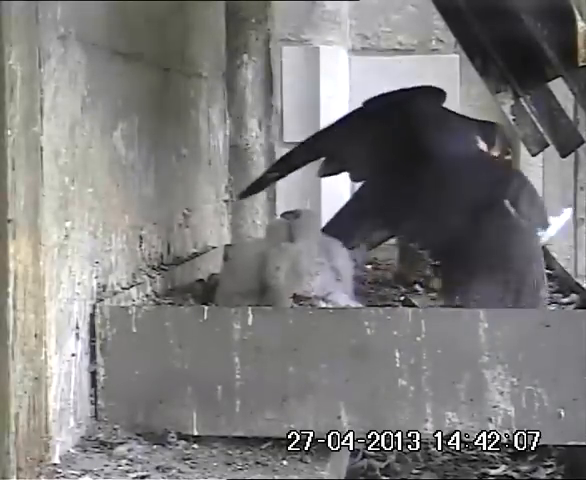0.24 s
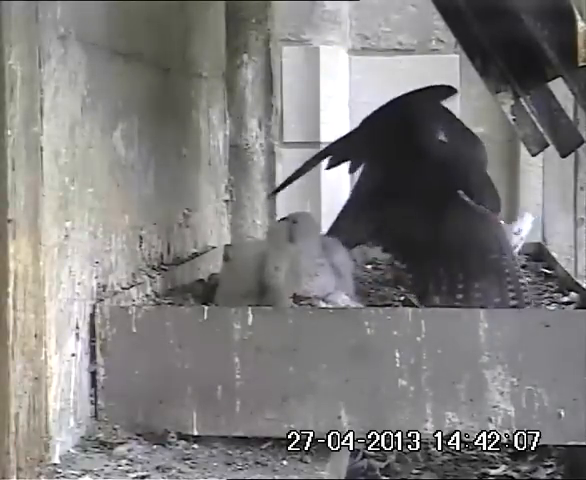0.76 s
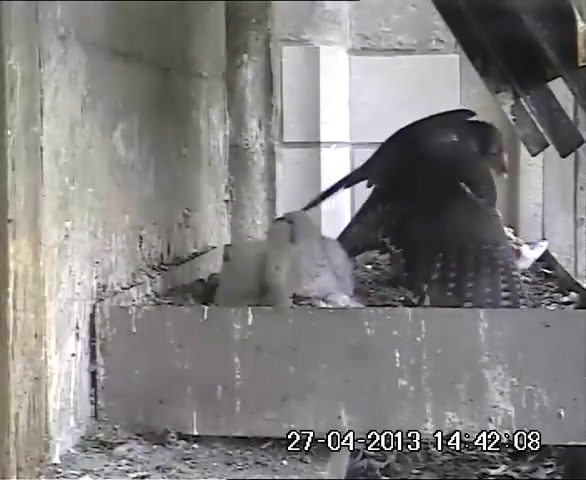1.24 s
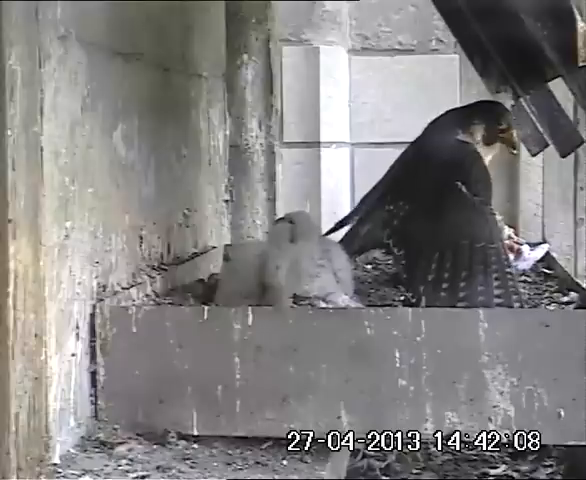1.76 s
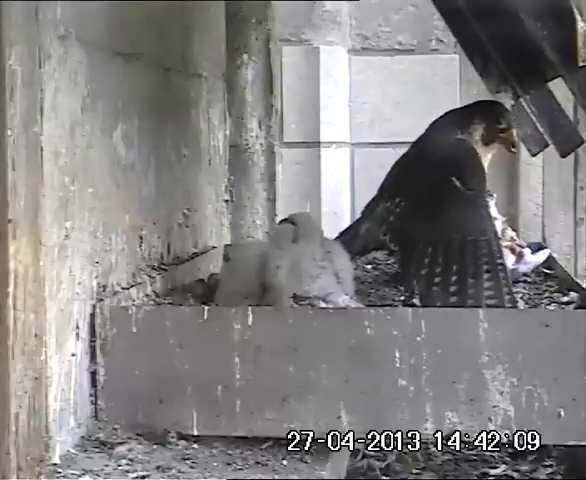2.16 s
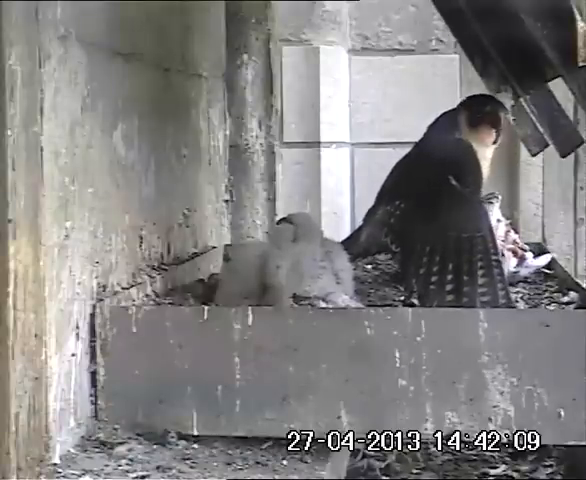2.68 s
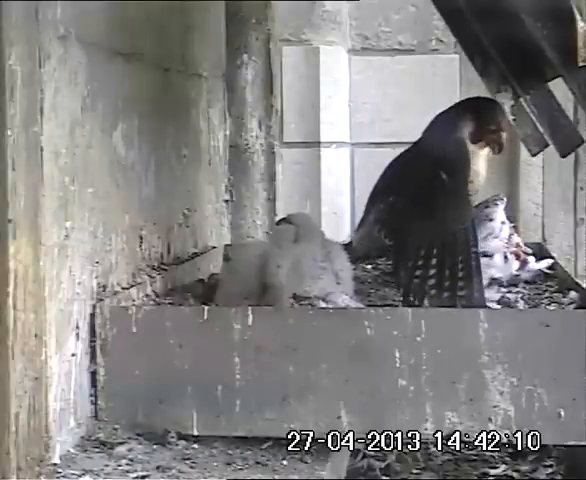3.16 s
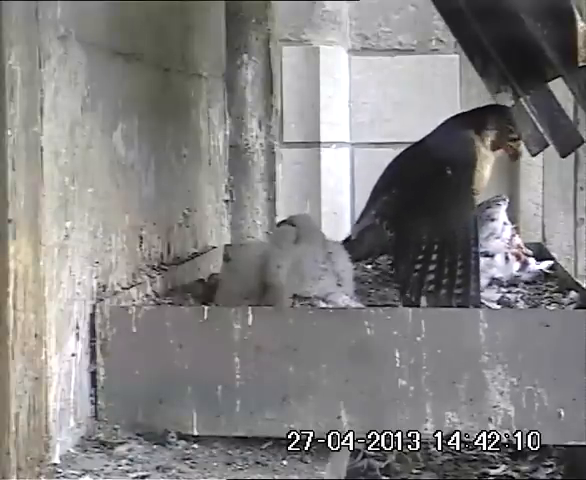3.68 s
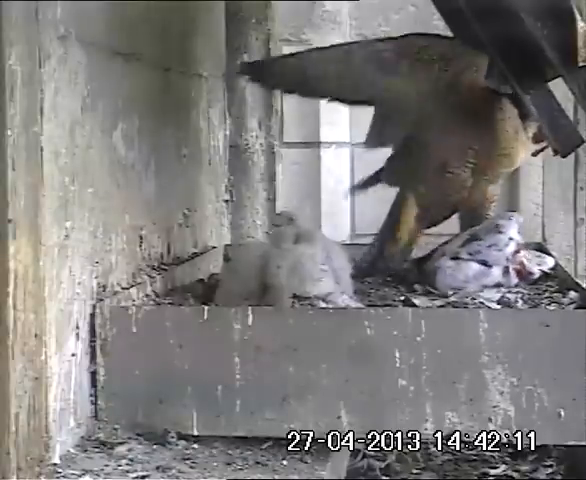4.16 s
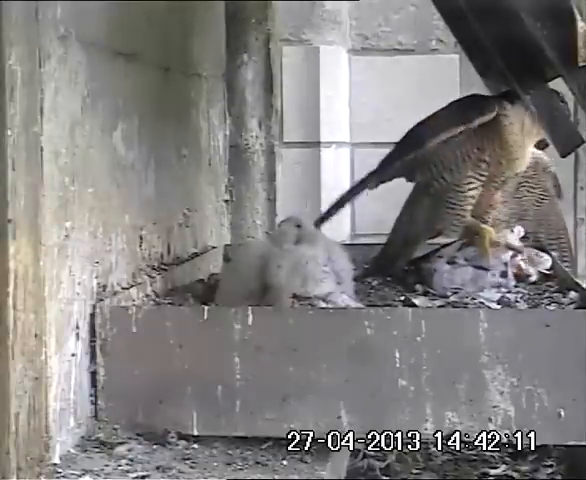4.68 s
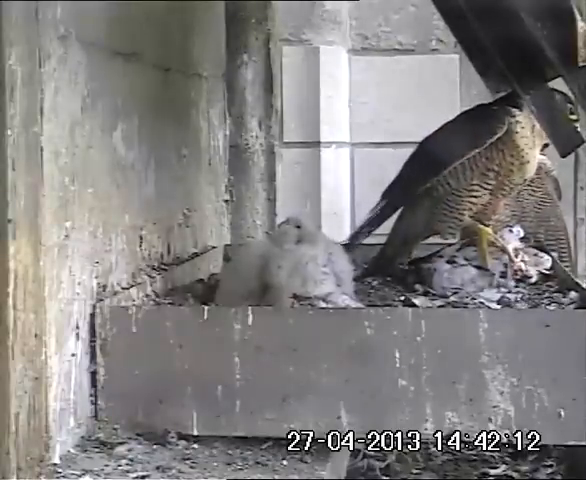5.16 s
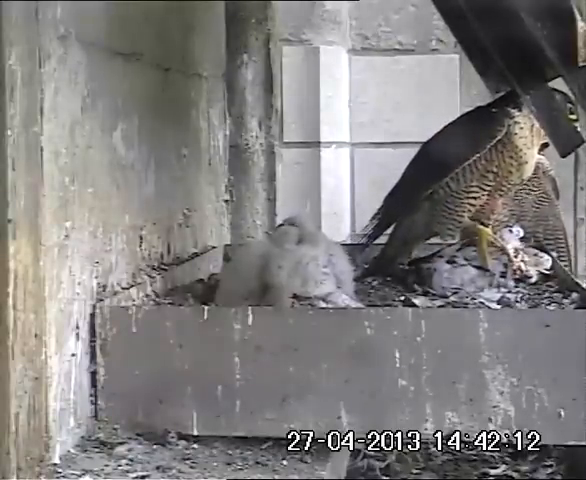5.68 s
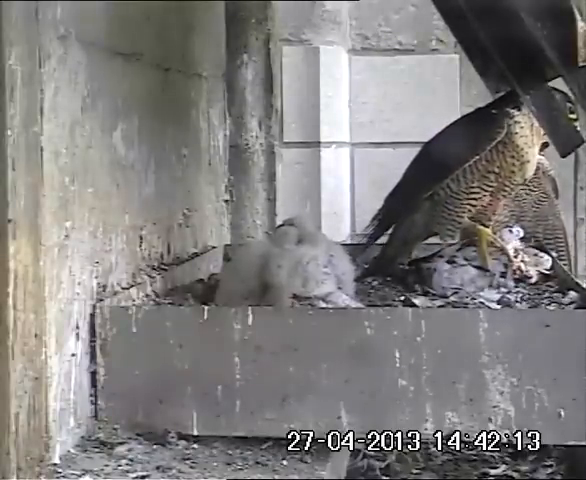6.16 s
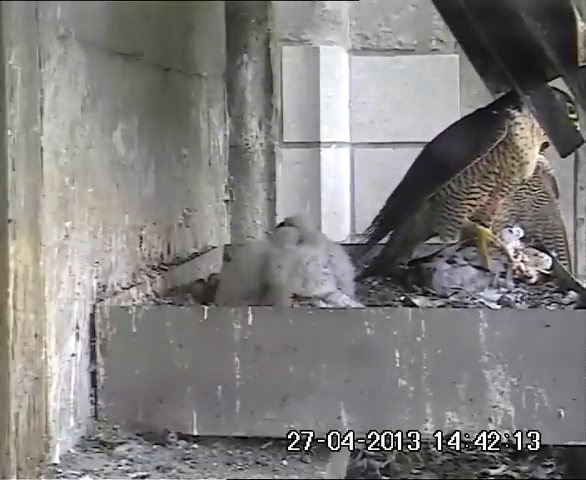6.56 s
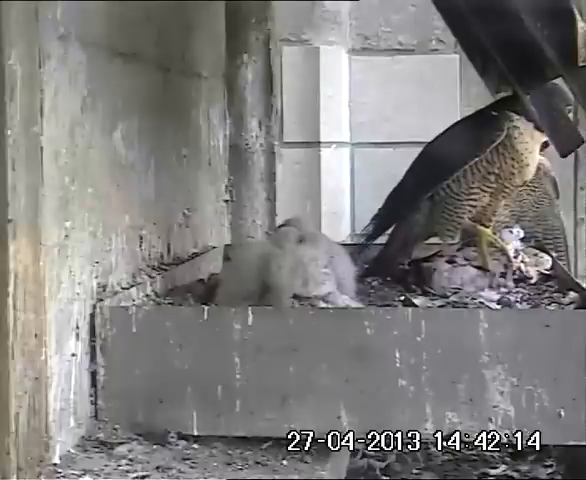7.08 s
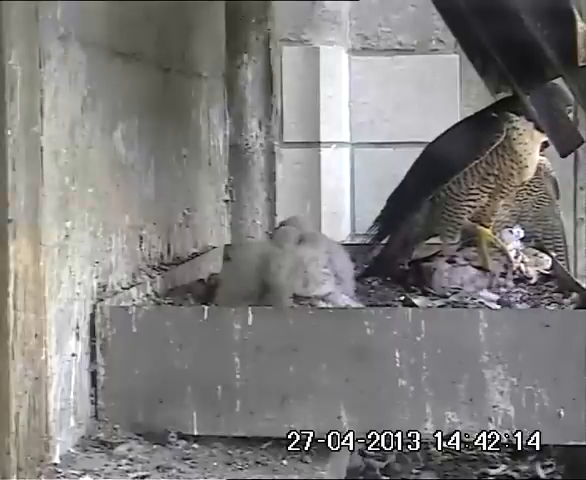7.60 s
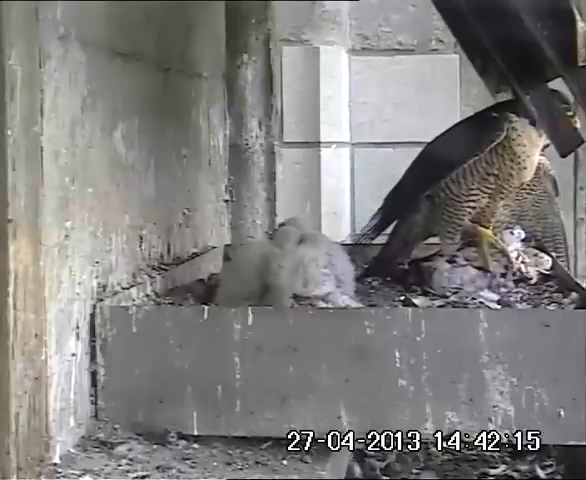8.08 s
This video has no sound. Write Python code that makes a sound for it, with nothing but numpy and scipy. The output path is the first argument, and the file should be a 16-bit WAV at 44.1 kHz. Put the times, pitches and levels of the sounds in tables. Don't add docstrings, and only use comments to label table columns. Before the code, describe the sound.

Loud, shrill falcon chatter, thick with a rasping second voice at first, then one bird repeating short whistled yelps, overloading a close microphone.

```python
import sys
import numpy as np
from scipy import signal
from scipy.fft import rfft, irfft
from scipy.io import wavfile
from scipy.ndimage import uniform_filter1d

SR = 44100
rng = np.random.default_rng(int(sys.argv[2]) if len(sys.argv) > 2 else 0)


def to_wav(s):
    ch = np.atleast_2d(s).T
    pcm = np.round(np.clip(ch, -1, 1) * 32767)
    wavfile.write(sys.argv[1], SR, pcm.astype(np.int16))


def amplitude_ratio(level_db):
    exponent = np.asarray(level_db, float) / 20
    return 10 ** exponent


N = 367353

# frequency [Hz], density [dB per Hz].
TOWN_COLOUR = [(20, -31.5), (60, -12), (172, -3.5), (215, -8.5), (260, -2), (320, -9), (375, -2),
               (510, -10.5), (660, -5), (900, -7), (1300, -12.5), (2000, -18.5), (4000, -31)]
# time [s], level [dB].
GUST_LEVEL = [
    (7.68, -50),
    (7.72, -31),
    (7.8, -36),
    (7.96, -31.5),
    (8.06, -33),
    (8.18, -36.5),
    (8.28, -33.5),
    (8.34, -36),
]
# time [s], peak [dB], frequency [Hz].
THUMPS = [(7.715, -10.5, 180), (7.738, -18, 200), (7.85, -14, 236), (7.886, -14, 258), (7.945, -12.5, 200),
          (7.954, -9, 308), (7.968, -14, 222), (8.043, -9, 189), (8.101, -17, 218), (8.127, -21, 120),
          (.028, -14, 674), (4.182, -18, 738), (8.27, -11.5, 218), (8.293, -16, 148)]
# time [s], level [dB].
RUSTLE_LEVEL = [
    (3.4, -44),
    (3.44, -38),
    (3.86, -28),
    (3.95, -26),
    (4.17, -39),
    (4.19, -12.5),
    (4.21, -52),
]
# time [s], peak [dB].
TICKS = [
    (1.984, -20),
    (3.4381, -23),
    (7.2306, -30),
]

# centre
# [Hz], # width [Hz], gain [dB].
THROAT = [
    (1400, 1200, -0.5),
    (2485, 1040, 14),
    (3150, 1500, -10),
    (3850, 2400, 0.5),
    (4325, 120, -11.5),
]
# start [s], length [s], first level [dB], last level [dB].
SCREECHES = [(0, 0.173, -14.5, -12.5), (0.185, .14, -17.5, -21), (0.314, 0.281, -14, -16.5),
             (0.61, 0.089, -12.5, -38.5), (0.756, 0.2693, -14, -11.5), (1.015, 0.1, -14.5, -23.5),
             (1.113, .245, -11.5, -15.5), (1.41, 0.11, -10.5, -34.5), (1.501, .265, -14.5, -13.5),
             (1.904, 0.022, -23, -21), (2.01, .235, -15, -15), (2.39, 0.2153, -15.5, -13),
             (2.812, 0.313, -14.5, -13), (7.414, 0.011, -8.5, -29)]
# mean pitch [Hz], level [dB].
MEMBRANES = [
    (1600, -7.5),
    (2350, -3.5),
    (3050, -2.5),
]
# start [s], length [s], first pitch [Hz], last pitch [Hz], level [dB].
CROAKS = [(.15, .025, 1720, 1377, -25), (.327, .02, 1407, 1484, -23), (0.36, .04, 1642, 1359, -24),
          (0.646, 0.036, 1745, 1447, -32), (0.757, .022, 1449, 1284, -21), (0.798, .035, 1137, 1584, -27),
          (0.965, 0.018, 1613, 1304, -17), (1.115, .049, 1445, 1194, -23.5),
          (1.206, .036, 1552, 1517, -22.5), (1.323, 0.023, 1509, 1390, -19.5),
          (1.417, .02, 1512, 1366, -23), (1.505, .029, 1400, 1485, -19), (1.612, 0.032, 1650, 1580, -21),
          (1.741, .032, 1637, 1298, -20.5), (2.004, .03, 1312, 1480, -21), (2.212, .026, 1674, 1380, -19.5),
          (2.383, .023, 1440, 1283, -20), (2.467, 0.024, 1750, 1473, -22.5),
          (2.567, 0.02536, 1793, 1306, -20), (2.911, .03, 1688, 1662, -22), (3.092, .03, 1450, 1300, -23)]
# multiple of the pitch [1], level [dB].
CROAK_HARMONICS = [
    (1, 6.5),
    (2, -0.5),
    (3, 4),
]
# time [s], pitch [Hz], level [dB].
WAVERS = [
    [(0, 3040, -17), (.016, 2850, -8), (.05, 3500, -21.5), (.086, 2613, -27.5), (.13, 3610, -24.5),
     (.158, 2003, -8)],
    [(.175, 3027, -31), (.19, 3150, -21), (.25, 2780, -27), (.28, 2850, -30), (.3, 2850, -22)],
    [(.595, 4160, -9), (.615, 2960, -26), (.645, 2010, -17)],
    [(.745, 2800, -25.5), (.795, 3850, -16.5), (.83, 2986, -14), (.862, 3775, -13.5), (.89, 2925, -15.5),
     (.935, 3863, -18.5), (.978, 2885, -16.5)],
    [(.978, 2950, -25.5), (1.012, 3470, -22.5), (1.052, 2766, -22), (1.09, 3050, -17), (1.118, 2800, -24.5)],
    [(1.365, 2850, -21), (1.397, 3720, -18.5), (1.42, 2550, -18.5)],
    [(1.51, 2850, -23), (1.552, 3300, -19.5), (1.6, 3150, -23), (1.66, 2360, -22.5), (1.7, 3050, -16)],
    [(2.125, 3130, -22), (2.19, 3300, -18.5), (2.2, 3260, -28.5)],
    [(4.181, 1988, -11), (4.205, 2323, -14.5)],
]

# start [s], length [s], level [dB], pitch the next low arc climbs to [Hz].
CHIPS = [(-.15, .02, -24, 2500), (.318, .018, -19, 2475), (0.726, .022, -24.5, 2602),
         (1.244, .025, -20, 2528), (1.705, 0.015, -20.5, 2480), (2.167, .02, -20.5, 2454),
         (2.689, .02, -17, 2620), (3.139, .02, -17, 2612), (3.602, 0.014, -16.5, 2648),
         (4.155, 0.034, -15.5, 2536), (4.642, .016, -18.5, 2492), (4.998, 0.012, -16.5, 2495),
         (5.375, 0.015, -16, 2500), (5.762, 0.017, -16.5, 2550), (6.125, 0.022, -16.5, 2522),
         (6.522, .017, -17, 2557), (6.896, 0.018, -15, 2710), (7.343, 0.017, -15, 2743),
         (7.728, .02, -16, 2558), (8.115, 0.016, -16.5, 2578)]
# start, middle, end [Hz].
CHIP_HZ = (1084.4, 1158, 1388)
# start [s], length [s], level [dB], last pitch [Hz], length of the high arc before it [s].
LONG_YELPS = [(-.07, 0.02, -12, 1200, .03), (0.405, .054, -13.5, 1212, 0.024),
              (0.875, .03, -20, 1280, 0.017), (1.337, 0.042, -13.5, 1236, 0.032),
              (1.783, .05, -12.5, 1231, .04), (2.252, .056, -13, 1334, .03), (2.787, .048, -13, 1241, .046),
              (3.226, .034, -12, 1227, 0.042), (3.679, .053, -13, 1341, 0.046),
              (4.265, .052, -12.5, 1392, 0.038), (4.716, .032, -11, 1202, 0.037),
              (5.062, .036, -11, 1190, 0.023), (5.443, .038, -11, 1184, 0.028),
              (5.828, .034, -11, 1180, .028), (6.201, .035, -10, 1157, 0.035),
              (6.593, .032, -10.5, 1290, 0.036), (6.981, .033, -9, 1250, .045),
              (7.42, 0.032, -15.5, 1301, 0.029), (7.803, .035, -10.5, 1166, 0.037),
              (8.19, .04, -10.5, 1180, .035)]
# start [s], level [dB], low arc first pitch [Hz], low arc last pitch [Hz],
# length of the high arc [s].
LAST_YELPS = [(0.099, -15.5, 2250, 2267, 0.019), (.565, -12.5, 1800, 2510, .06),
              (.999, -17, 1993, 2422, 0.033), (1.475, -11, 2000, 2500, 0.069),
              (1.936, -14, 1750, 2477, 0.035), (2.396, -12.5, 1746, 2425, 0.021),
              (2.929, -13.5, 1940, 2500, .02), (3.35, -13.5, 2150, 2560, 0.043),
              (3.82, -12, 2067, 2460, .016), (4.407, -11, 1825, 2577, 0.00041),
              (4.816, -10.5, 1990, 2353, .05), (5.159, -10, 2203, 2192, 0.00083),
              (5.542, -12.5, 2120, 2273, .034), (5.929, -10.5, 2100, 2300, 0.049),
              (6.298, -12, 2250, 2185, 0.053), (6.698, -10, 2050, 2380, .05),
              (7.086, -11.5, 2150, 2244, 0.011), (7.529, -9.5, 2150, 2464, .054),
              (7.918, -10.5, 2167, 2480, 0.062), (8.304, -11, 2246, 2300, .036)]
# multiple of the pitch [1], level [dB].
YELP_HARMONICS = [
    (1, -9),
    (2, 4.5),
    (3, -13),
    (4, -22.5),
]

LONG_START_HZ, LONG_SAG_HZ_PER_S, LONG_SAG = 1300.5, 1900, .25
LONG_HOLD_DB = -1.5
LAST_S, LAST_HZ = 0.02614, (1280, 1224.4, 1086.5)
FIRST_LOW_HZ = 2150
LOW_DB, LOW_BEND, LOW_ARCH_HZ = -18, .75, 60
LOW_DIVE_S, HIGH_DIVE_S = .006, .009
HIGH_DB, HIGH_RISE_PER_S, HIGH_MIDDLE, HIGH_END = -22, 2.5, 1, 0.95
HIGH_TOP_HZ, HIGH_FOLLOWS = (3300, 3294), 0.71
ARC_FOLLOWS = .6
DIVE_LEAD_S, DIVE_LANDS_S, CLIMB_S = .005, .005, .011


def level(x, db):
    return x * amplitude_ratio(db) / np.sqrt(np.mean(x ** 2))


def band(x, hz, width):
    edges = [hz - width / 2, hz + width / 2]
    return signal.sosfilt(signal.butter(1, edges, "bandpass", fs=SR, output="sos"), x)


def walk(rate):
    hold = int(SR / rate)
    steps = np.repeat(rng.standard_normal(N // hold + 1), hold)
    return 1.3 * uniform_filter1d(uniform_filter1d(steps, hold), hold)[:N]


def curve(table):
    s, db = np.transpose(table)
    return amplitude_ratio(np.interp(np.arange(N) / SR, s, db, left=-120, right=-120))


def town():
    hz, db = np.transpose(TOWN_COLOUR)
    colour = amplitude_ratio(np.interp(np.log(np.fft.rfftfreq(N, 1 / SR) + 1), np.log(hz), db))
    hum = irfft(rfft(rng.standard_normal(N)) * colour, N)
    return level(hum * amplitude_ratio(0.56 * walk(2.6)), -29.5)


def gust():
    rumble = band(band(rng.standard_normal(N), 220, 260), 220, 260)
    return level(rumble * amplitude_ratio(3.0 * walk(30)), 0) * curve(GUST_LEVEL)


def thumps():
    out, t = np.zeros(N + 4000), np.arange(-1000, 1000) / SR
    for s, db, hz in THUMPS:
        cycles = np.clip(hz / 300, .7, 3)
        knock = np.cos(2 * np.pi * hz * t) * np.exp(-(t * hz / cycles) ** 2)
        out[int(s * SR):][:len(t)] += amplitude_ratio(db) * knock
    return out[len(t) // 2:][:N]


def rustle():
    grains = rng.standard_normal(N) * amplitude_ratio(1.7 * walk(150))
    return level(band(grains, 3100, 4300), 3.4) * curve(RUSTLE_LEVEL)


def ticks():
    out = np.zeros(N)
    for s, db in TICKS:
        out[int(s * SR)] = amplitude_ratio(db + 27.5)
    return band(band(out, 3200, 2000), 3200, 2000)


def throat(x):
    y = sum((-1) ** k * amplitude_ratio(db) * band(x, hz, width) for k, (hz, width, db) in enumerate(THROAT))
    return signal.sosfilt(signal.butter(4, 1200, "highpass", fs=SR, output="sos"), y)


def sing(notes, harmonics, jitter, shimmer_db, rise_s, fall_s):
    out, wobble, shimmer = np.zeros(N), jitter * walk(450), amplitude_ratio(shimmer_db * walk(160))
    for s, length, first, middle, last, db in notes:
        i = np.arange(max(int(s * SR), 0), min(int((s + length) * SR), N))
        u = (i / SR - s) / length
        hz = first * (1 - u) * (1 - 2 * u) + 4 * middle * u * (1 - u) + last * u * (2 * u - 1)
        phase = 2 * np.pi * np.cumsum(hz * (1 + wobble[i])) / SR
        shape = np.clip(u * length / rise_s, 0, 1) * np.clip((1 - u) * length / fall_s, 0, 1)
        tone = sum(amplitude_ratio(g) * np.sin(k * phase) for k, g in harmonics)
        out[i] += amplitude_ratio(db + 4.0) * shape * shimmer[i] * tone
    return out


def screech():
    t, effort = np.arange(N) / SR, np.zeros(N)
    for s, length, start_db, end_db in SCREECHES:
        edge = np.clip(np.minimum((t - s) / 0.0047, (s + length - t) / 0.0081), 0, 1)
        effort += edge * amplitude_ratio(start_db + (end_db - start_db) * np.clip((t - s) / length, 0, 1))
    rasp = level(throat(rng.standard_normal(N)), -6.0)
    for hz, db in MEMBRANES:
        pitch = hz * (1 + .11 * np.tanh(walk(24)) + .04 * walk(700))
        phase = 2 * np.pi * np.cumsum(pitch) / SR
        flutter = 1 + 0.57 * np.sin(2 * np.pi * np.cumsum(280 * (1 + .3 * walk(60))) / SR)
        rasp = rasp + level(np.sin(phase) * flutter * amplitude_ratio(2.5 * walk(70)), db - 7.5)
    croaks = [(s, length, a, (a + c) / 2, c, db) for s, length, a, c, db in CROAKS]
    return level(rasp, 0) * effort + sing(croaks, CROAK_HARMONICS, 0.0402, 1.3, 0.0063, 0.0057)


def wavering_whistle():
    out, rough, shimmer = np.zeros(N), .025 * walk(450), amplitude_ratio(2.5 * walk(160))
    for phrase in WAVERS:
        s, hz, db = np.transpose(phrase)
        i = np.arange(max(int(s[0] * SR), 0), int(s[-1] * SR))
        place = np.interp(i / SR, s, np.arange(len(s)))
        eased = np.floor(place) + .5 - .5 * np.cos(np.pi * (place % 1))
        pitch = np.interp(eased, np.arange(len(s)), hz) * (1 + rough[i])
        edge = np.clip(np.minimum(i - i[0], i[-1] - i) / SR / 0.0036, 0, 1)
        gain = edge * amplitude_ratio(np.interp(i / SR, s, db) + 1.5) * shimmer[i]
        out[i] += gain * np.sin(2 * np.pi * np.cumsum(pitch) / SR)
    return out


def arcs_before(start, yelp, low_hz, top_hz, high_s, effort_db):
    first, last = low_hz
    middle = first + LOW_BEND * (last - first) + LOW_ARCH_HZ
    top = top_hz + HIGH_FOLLOWS * (last - 2500)
    high_db, high_s = (HIGH_DB + effort_db, high_s) if high_s else (-90, .01)
    high_first = (1 - HIGH_RISE_PER_S * high_s) * top
    return [(start, yelp - LOW_DIVE_S - start, first, middle, last, LOW_DB + effort_db),
            (yelp - HIGH_DIVE_S - high_s, high_s, high_first, HIGH_MIDDLE * top, HIGH_END * top, high_db)]


def calls():
    chips, yelps, whistles = [], [], []
    for chip, long_yelp, last_yelp in zip(CHIPS, LONG_YELPS, LAST_YELPS):
        s, chip_s, chip_db, low_hz = chip
        s1, length, db1, end, high1 = long_yelp
        s2, db2, low_first, low_last, high2 = last_yelp
        effort_db = ARC_FOLLOWS * (chip_db + 17)
        chips.append((s, chip_s, *CHIP_HZ, chip_db))
        middle = LONG_START_HZ - LONG_SAG_HZ_PER_S * length - LONG_SAG * (end - LONG_START_HZ)
        yelps.append((s1, length, LONG_START_HZ, middle, end, db1 + LONG_HOLD_DB))
        yelps.append((s2, LAST_S, *LAST_HZ, db2))
        first_rise, second_rise = (FIRST_LOW_HZ, low_hz), (low_first, low_last)
        whistles += arcs_before(s + chip_s - .004, s1, first_rise, HIGH_TOP_HZ[0], high1, effort_db)
        whistles += arcs_before(s1 + length - .002, s2, second_rise, HIGH_TOP_HZ[1], high2, effort_db)
    return chips, yelps, whistles


def slides(whistles, yelps, dive_db=-0.5, climb_db=-1.0):
    out = []
    for k, (s, length, first, _, last, db) in enumerate(whistles):
        start, _, low = yelps[k // 2][:3]
        wait, high = start - s - length, k % 2
        goal = low * (1 + high)
        dive_s = DIVE_LEAD_S + wait + DIVE_LANDS_S
        out.append((s + length - DIVE_LEAD_S, dive_s, last, .72 * last + .28 * goal, goal, db + dive_db))
        if not high:
            out.append((start - .005, .02, 1.1 * low, low, low, db - 2.5))
        if k % 4 == 2:
            left = yelps[k // 2 - 1][4]
            out.append((s + .004 - CLIMB_S, CLIMB_S, left, (first + left) / 2, first, db + climb_db))
    return out


def chitter():
    chips, held, whistles = calls()
    arcs = sing(whistles, [(1, 0.0041)], 0.016, 1.94, 0.0018, 0.0022)
    arcs = arcs + amplitude_ratio(8.5) * band(band(arcs ** 3, 4050, 500), 4050, 500)
    yelps = sing(chips, YELP_HARMONICS, 0.0073, 1.1, 0.0028, 0.0036)
    yelps = yelps + sing(held[::2], YELP_HARMONICS, .014, 0.9, 0.0075, .007)
    yelps = yelps + sing(held[1::2], YELP_HARMONICS, .012, 0.94, 0.006, .018)
    glides = sing(slides(whistles, held), [(1, 0.76)], .035, 3.4, 0.0022, 0.0016)
    power = 0.13 * arcs ** 2 + 0.31 * yelps ** 2 + 4.4 * glides ** 2
    effort = np.sqrt(uniform_filter1d(power, size=200) + 1e-9)
    air = level(band(throat(rng.standard_normal(N)), 2000, 2300), -8.5)
    return arcs + yelps + glides + effort * air


def scene():
    birds = chitter() + wavering_whistle() + screech()
    t = np.arange(4000) / SR
    walls = rng.standard_normal(len(t)) * amplitude_ratio(-60 * t / 0.071) * (t > .002)
    wet = signal.fftconvolve(birds, walls / np.sqrt(np.sum(walls ** 2)))[:N]
    birds = birds + amplitude_ratio(-10.0) * wet
    return (birds + rustle() + ticks() + thumps() + gust() + town())[None]


def low_pass(x):
    return signal.sosfilt(signal.butter(12, 15830, fs=SR, output="sos"), x)


def record(dry):
    knee = 3.19
    coarse = signal.resample_poly(dry, 80, 441, axis=1)
    coarse = coarse / (1 + np.abs(coarse / 0.7) ** knee) ** (1 / knee)
    fine = signal.resample_poly(coarse, 441, 80, axis=1)[:, :N]
    fine = signal.sosfiltfilt(signal.cheby2(14, 27, 4650, fs=SR, output="sos"), fine)
    fine = np.clip(fine, -.716, .716) - .0033
    return low_pass(fine)


dry = scene()
out = record(dry)
to_wav(out)
```